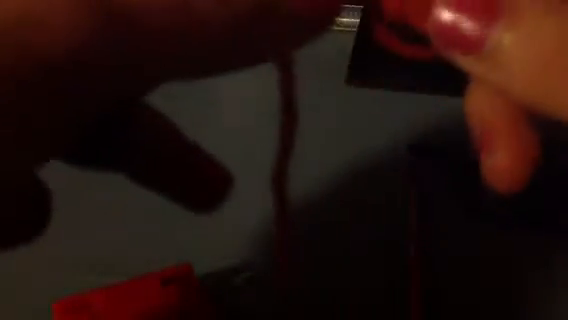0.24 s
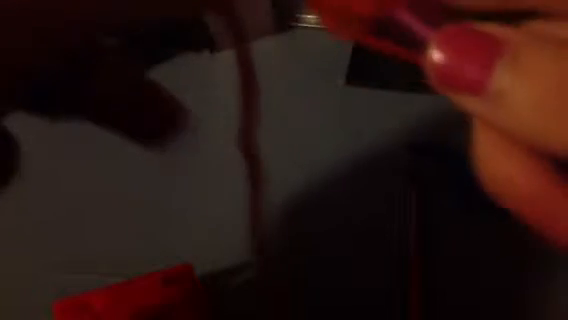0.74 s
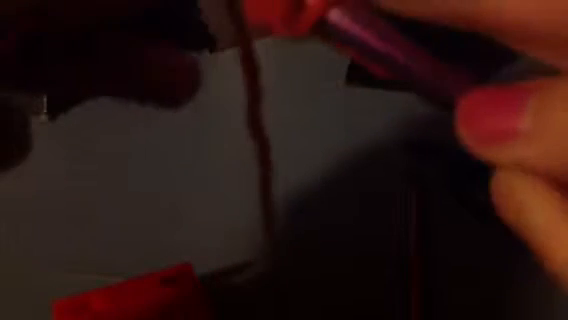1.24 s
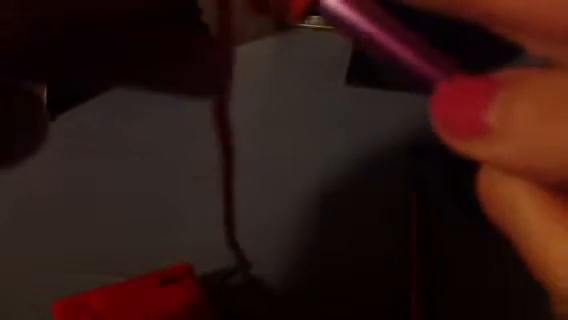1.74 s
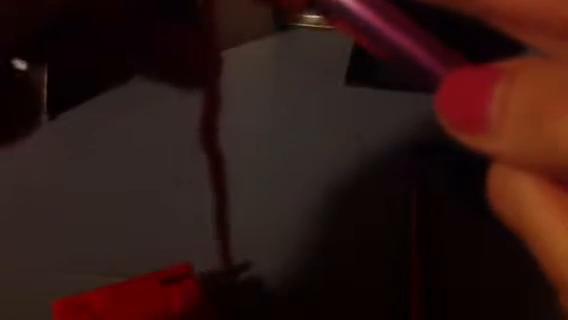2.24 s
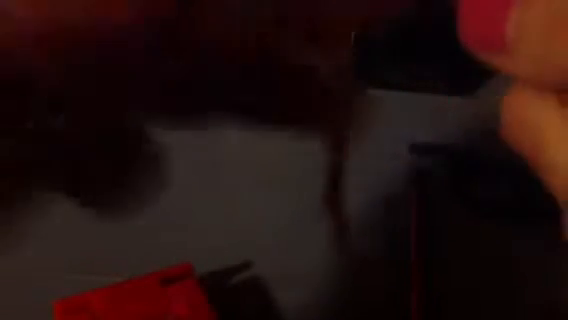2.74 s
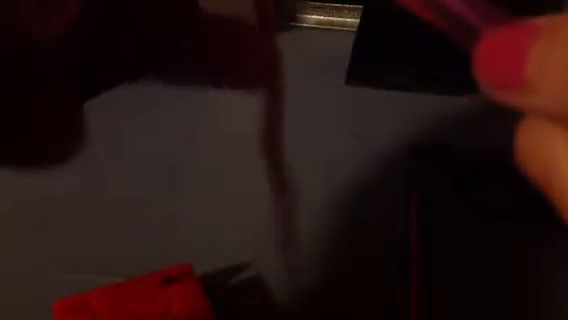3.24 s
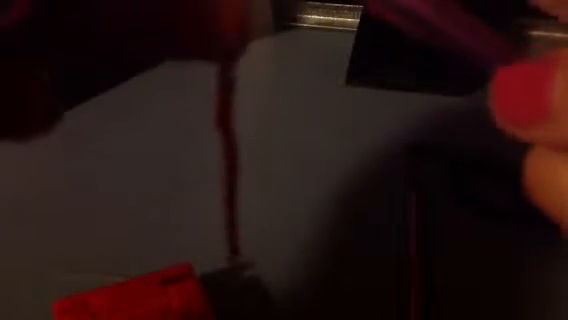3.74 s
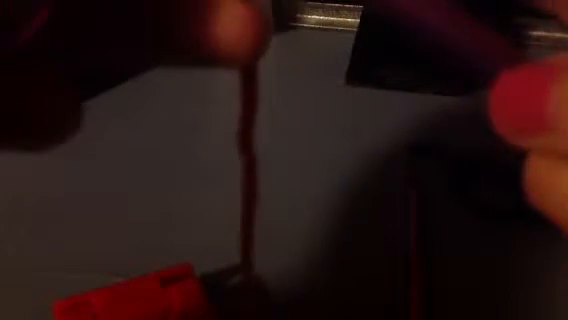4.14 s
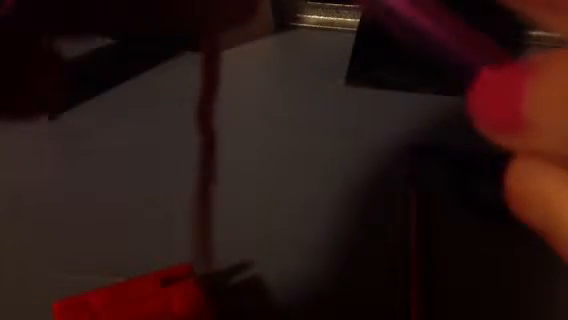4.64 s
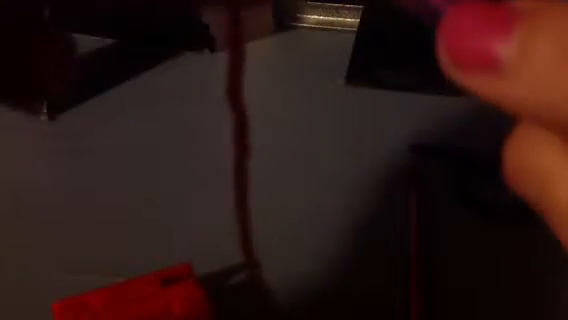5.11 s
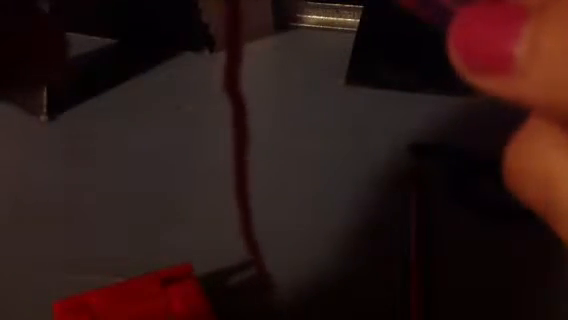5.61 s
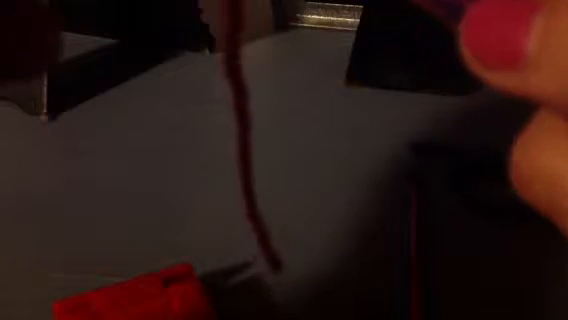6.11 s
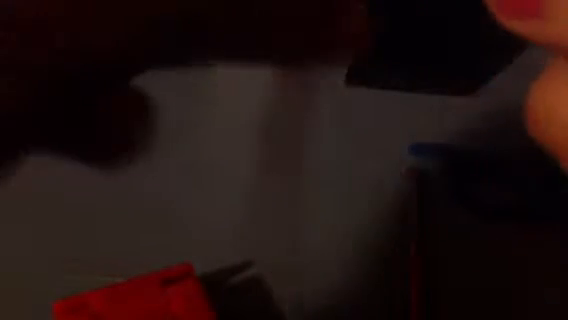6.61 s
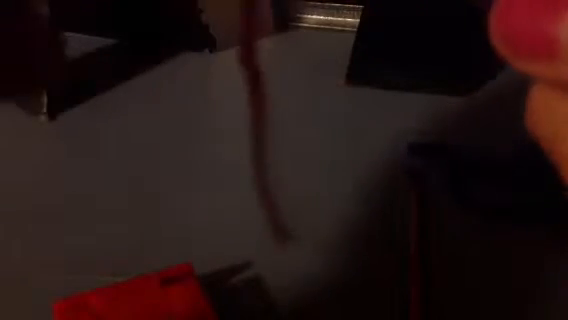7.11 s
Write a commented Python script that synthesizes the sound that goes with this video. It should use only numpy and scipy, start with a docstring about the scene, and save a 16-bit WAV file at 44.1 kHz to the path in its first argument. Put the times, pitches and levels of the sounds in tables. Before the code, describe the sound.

Close, sparse needle clicks and soft knocks, two bright scraping flurries, the later one sharpest, and gentle yarn drags over a faint room hum.

```python
"""Knitting up close

Knitting close to the microphone in a quiet room: needle tips click and scrape along each other,
the needles knock dully as they are handled, and yarn is drawn over them. Clicks and scrapes are noise
ringing through the needle resonances, knocks are a push plus decaying body modes, and the yarn is
dull stick-and-slip noise. A faint room tail follows; hum, low room noise and hiss lie underneath.
"""
import sys
import numpy as np
from scipy import signal
from scipy.fft import rfft, irfft, next_fast_len
from scipy.io import wavfile

SR = 44100
rng = np.random.default_rng(int(sys.argv[2]) if len(sys.argv) > 2 else 0)


def unload_wav(signal):
    """Save mono or channel-first audio to the path in sys.argv[1] as 16-bit WAV at rate SR, clipped to [-1, 1]."""
    wavfile.write(
        sys.argv[1],
        SR,
        np.round(np.clip(np.atleast_2d(signal).T, -1, 1) * 32767).astype(np.int16),
    )


N = 324576
TIME = np.arange(N) / SR   # s

# steady hum: pitch_hz, rms_db
HUM_TONES = [(120, -77), (240, -71.5), (358, -74)]
# spectrum of the room noise and hiss: frequency_hz, relative_level_db
AIR_SPECTRUM = [(25, -57), (60, -27), (100, -21), (135, -7.5), (200, -7), (320, -2), (430, -9),
                (800, -17.5), (5000, -25.5), (13000, -25), (16000, -29)]
AIR_RMS_DB = -61
# colour of the room's tail: frequency_hz, relative_level_db
WALL_SPECTRUM = [(100, -9.5), (400, 10), (1000, 3), (2400, -3), (4000, -6.5), (16000, -9.5)]
CUTOFF_HZ = 15350   # top of the finished sound

# dull knocks of the needles: start_s, level_db (rms of the first 10 ms), contact_hardness_hz (cut-off)
KNOCK_EVENTS = [(0.0615, -32, 800), (0.2711, -35.5, 1170), (1.0585, -27, 3400), (1.2253, -47, 2430),
                (1.3733, -53.5, 1390), (1.396, -47.5, 1370), (1.498, -50.5, 870), (1.6358, -47, 990),
                (1.6677, -50, 1400), (2.676, -33, 990), (3.0565, -30.5, 2200), (3.233, -53.5, 1390),
                (4.1379, -40, 1580), (4.4317, -31, 2060), (6.346, -35, 890), (6.3718, -38, 700),
                (6.6885, -40.5, 1700), (6.738, -42.5, 1406), (7.0024, -48, 1120)]
# resonances of the held needles: pitch_hz, relative_level_db, t60_s
BODY_MODES = [(236.8, -12, 0.18), (383, -17, 0.29), (670, -31, 0.0094), (900, -13.5, 0.0156),
              (1140, 5.5, 0.027), (1330, -10, 0.028), (1460, 8.5, 0.0088), (1605, 5, 0.058),
              (2167, 2.5, 0.03), (2530, -22, .025), (4300, 9, 0.0115)]
# spectrum of a knock's push and scatter: frequency_hz, relative_level_db
THUD_SPECTRUM = [(60, -60), (130, -13.5), (250, 0.5), (600, 2), (1100, 9), (2300, 1), (3200, 1),
                 (6000, 7.5), (16000, -18)]
# spectrum of yarn and fingers rubbing: frequency_hz, relative_level_db
RUB_SPECTRUM = [(50, -54), (130, -16), (250, -0.5), (500, -4), (750, -1), (1100, 3), (1500, -15),
                (2200, -18.5), (3500, -22), (16000, -26)]

# tip against tip: start_s, level_db (rms of the first 5 ms), ring_hz, ring_width_octaves
CLICK_EVENTS = [(0.447, -49.5, 7000, 2.7), (1.044, -46, 5400, 0.96), (1.0592, -28.5, 3740, 0.69),
                (1.2242, -33.5, 7140, 1.7), (1.6689, -39.5, 4200, 0.57), (2.662, -27.5, 9700, 0.29),
                (2.696, -36, 8300, 2.6), (2.726, -33, 9900, 1.2), (2.7813, -33.5, 7200, 0.43),
                (2.8642, -45.5, 13900, 0.57), (2.885, -51, 9000, .8), (2.92, -35.5, 12300, 1.3),
                (2.9284, -37.5, 12200, 0.91), (3.058, -33, 6250, 5.4), (3.1189, -42, 12000, 0.67),
                (3.158, -44.5, 13100, 0.23), (3.233, -39.5, 9000, 0.86), (3.37, -51, 12600, 0.44),
                (3.557, -58, 10700, 1.1), (3.806, -33.5, 8740, .28), (4.0281, -46.5, 8300, 1.7),
                (4.1377, -39.5, 4230, 1.5), (4.252, -54, 10000, .93), (4.4321, -29.5, 7000, 1.4),
                (5.326, -59, 11100, .65), (6.3097, -26, 9640, 0.13), (6.336, -32, 8300, 2.5),
                (6.3691, -18, 7370, 0.35), (6.4383, -24.5, 7100, .61), (6.528, -43, 11900, 0.61),
                (6.5489, -37.5, 12600, 1.3), (6.5636, -36.5, 10500, 1.1), (6.5942, -43.5, 11500, .94),
                (6.739, -37.5, 6860, 2.6), (6.7818, -44, 11200, .36), (6.8074, -54, 10400, 1.7),
                (6.8237, -44, 12600, .93), (7.0016, -31.5, 8950, 2.7)]
# the fingers' hold sets the needles' lowest ringing note: time_s, lowest_note_hz
GRIP_NOTES = [(.9, 4580), (1.06, 4080), (2.7, 3730), (4.42, 3770), (6.31, 6030), (6.37, 4700), (6.44, 3870),
              (7, 3300)]
# ringing notes of a needle: multiple_of_lowest_note, peak_db (over the valleys, before damping)
RING_NOTES = [(1, 10), (1.58, 6), (2.25, 7), (2.75, 8.5), (3.4, 4)]
RING_SPREAD_HZ = 420   # how far each note spreads to either side
CLICK_DAMPING_DB, SLIDE_DAMPING_DB = 11.5, 1   # sliding, hard or gentle, hardly damps the ringing

# a tip lands hard and skids along the other needle:
# start_s, length_s, scrape_db, yarn_drag_db (both before the fade along the skid), brightest_hz
SKID_STROKES = [(2.662, 0.054, -32, -39, 10500), (2.722, 0.057, -37.5, -43, 9000),
                (2.781, 0.062, -41.5, -50, 9000), (6.308, 0.092, -30.5, -36.5, 9300),
                (6.44, 0.072, -41, -51.5, 6800)]
# a skid bites at once and spends itself (shares of its length; fade from start to end)
SKID_BITE_SHARE, SKID_LIFT_SHARE = 0.13, 0.22
SKID_SCRAPE_LOSS_DB, SKID_DRAG_LOSS_DB = 21.5, 6
# a needle is drawn gently through the yarn: start_s, length_s, scrape_db, yarn_drag_db, brightest_hz
DRAW_STROKES = [(0.029, 0.15, -58.5, -56, 5600), (0.639, 0.31, -56, -64, 8700),
                (1.027, 0.022, -56, -66, 5050), (1.1, 0.084, -85, -52, 5000),
                (1.359, 0.054, -63, -52, 5100), (1.429, 0.19, -69.5, -53, 4530),
                (1.757, 0.058, -64.5, -66, 12100), (2.621, 0.14, -56, -46.5, 9500),
                (2.86, 0.15, -60.5, -66, 13000), (3.519, .1, -72.5, -60.5, 10000),
                (4.397, 0.031, -47, -55.5, 3730), (4.455, 0.074, -75, -53, 6500),
                (4.571, 0.26, -68.5, -58.5, 10000), (4.83, 0.19, -86, -66, 10000),
                (6.261, 0.17, -50.5, -50, 9200), (6.5, 0.15, -51.5, -68, 12500),
                (7.041, .17, -68, -67.5, 4970), (7.282, 0.087, -79, -63, 8950)]
# a draw swells, holds and eases off (shares of its length)
DRAW_SWELL_SHARE, DRAW_EASE_SHARE = 0.18, 0.33

# along every stroke the tip snags and the needles bump at random
# the nearer the point, the brighter the scrape and the more it snags: level with the scrape at SNAG_HZ
SNAGS_PER_S, SNAG_HZ, SNAG_DB_PER_OCTAVE = 33, 10100, 24
BUMPS_PER_S, BUMP_DB = 24, -4   # level over the drag


def from_db(db):
    """Decibels to gain."""
    return 10 ** (np.asarray(db) / 20)


def rms_one(x, size=None):
    """Scale so that the first `size` samples (or all) have rms 1."""
    return x / np.sqrt(np.mean(x[:size] ** 2) + 1e-20)


def as_loud(x, like):
    """Give x the energy of another sound."""
    return x * np.sqrt(np.sum(like ** 2) / np.sum(x ** 2))


def colour(x, db_at):
    """Causal (minimum-phase) filter whose gain in dB is a function of frequency."""
    size = 2 * next_fast_len(len(x) // 2 + 1024)
    hz = np.maximum(np.arange(size // 2 + 1) * SR / size, 1)
    # folding the cepstrum onto positive time gives minimum phase
    cepstrum = irfft(np.log(from_db(db_at(hz))))
    cepstrum[1:size // 2] *= 2
    cepstrum[size // 2 + 1:] = 0
    response = np.exp(rfft(cepstrum))
    return irfft(rfft(x, size) * response)[:len(x)]


def shaped(x, points):
    """Filter x along a curve drawn through (Hz, dB) points on a log-frequency axis."""
    at, db = np.transpose(points)
    return colour(x, lambda hz: np.interp(np.log(hz), np.log(at), db))


def dying(t, t60):
    """Decay by 60 dB in t60 seconds."""
    return from_db(-60 * t / t60)


def add(out, s, sound):
    """Mix a sound in at s seconds."""
    start = int(np.clip(s * SR, 0, N - 1))
    out[start:start + len(sound)] += sound[:N - start]


def background():
    """Low room noise and microphone hiss as shaped noise, with a mains-like hum of steady sines."""
    hum = np.zeros(N)
    for hz, db in HUM_TONES:
        phase = rng.random()   # turns
        hum += np.sqrt(2) * from_db(db) * np.sin(2 * np.pi * (hz * TIME + phase))
    air = rms_one(shaped(rng.standard_normal(N), AIR_SPECTRUM))
    return from_db(AIR_RMS_DB) * air + hum


def room(x, t60=0.32, wet_db=-15, first_wall_s=0.018):
    """A faint, dull tail from the walls: convolution with decaying noise after a short gap."""
    t = TIME[:SR]
    decay = dying(t, t60)
    tail = shaped(rng.standard_normal(len(t)) * decay * (t > first_wall_s), WALL_SPECTRUM)
    tail = tail / np.sqrt(np.sum(decay ** 2))
    return from_db(wet_db) * signal.fftconvolve(x, tail)[:N]


def pressure(length, rise_share, fall_share):
    """Attack, hold and release of one stroke, from 0 to 1."""
    along = np.linspace(0, 1, max(int(length * SR), 64))
    return np.clip(np.minimum(along / rise_share, (1 - along) / fall_share), 0, 1)


def stroke(force, per_s, spread_db, smooth_db, uneven_db, grab_s=0.00716):
    """Stick and slip: tiny catches over a smooth hiss, under a force that wavers."""
    catch_sizes = np.minimum(rng.exponential(1, SR), 4)
    impulses = from_db(spread_db * catch_sizes) * rng.choice([-1, 1], SR)
    catches = impulses * (rng.random(SR) < per_s / SR)
    grit = rms_one(catches) + from_db(smooth_db) * rng.standard_normal(SR)
    # the waver drifts to a new random value every grab_s
    waver = np.interp(TIME[:SR] / grab_s, np.arange(200), rng.standard_normal(200))
    grit = rms_one((grit * from_db(uneven_db * waver))[:len(force)])
    return np.pad(grit * force, (0, 6000))   # space to ring out


def now_and_then(sound, force, per_s, count=16):
    """Repeat a small sound at uneven gaps along a stroke, scaled by the force and a random size."""
    draws = rng.random((count, 2))
    at = ((np.arange(count) + draws[:, 0]) * SR / per_s).astype(int)
    out = np.zeros(len(force) + 6000)
    for i, size in zip(at[at < len(force)], .5 + draws[:, 1]):
        out[i:i + len(sound)] += force[i] * size * sound
    return out


def knock(hard_hz, push_db=17, scatter_t60=0.065, modes_db=-15, vary_db=2.5, low_hz=150):
    """One push, its scatter off nearby surfaces and the body's modes, all dulled by a soft contact."""
    t = TIME[:6000]
    thud = rng.standard_normal(len(t)) * dying(t, scatter_t60)
    thud[0] += 2 * from_db(push_db)
    strengths = from_db(modes_db + vary_db * rng.standard_normal(len(BODY_MODES)))
    modes = np.zeros(len(t))
    for k, (hz, db, t60) in enumerate(BODY_MODES):
        sign = (-1) ** k   # neighbouring modes start in opposite directions
        modes += sign * strengths[k] * from_db(db) * dying(t, t60) * np.sin(2 * np.pi * hz * t)
    soft = signal.butter(2, [low_hz, min(hard_hz, SR / 3)], "band", fs=SR, output="sos")
    return rms_one(signal.sosfilt(soft, shaped(thud, THUD_SPECTRUM) + modes), size=441)


def drag(force):
    """Yarn and fingers on the needles: a dull rub with soft bumps."""
    rub = stroke(force, per_s=250, spread_db=-0.5, smooth_db=-3.5, uneven_db=4)
    bumps = now_and_then(knock(hard_hz=1100), force, BUMPS_PER_S)
    return as_loud(shaped(rub, RUB_SPECTRUM), rub) + from_db(BUMP_DB) * bumps


def needle_db(hz, s, bright_hz, octaves, skirt_db, damping_db, low_hz=280, top_hz=14500):
    """Response of a needle: narrow bending resonances under a broad hump set by the contact."""
    lowest = np.interp(s, *np.transpose(GRIP_NOTES))
    notes = 1
    for multiple, db in RING_NOTES:
        offset = (hz - multiple * lowest) / RING_SPREAD_HZ
        notes = notes + from_db(db - damping_db) ** 2 / (1 + offset ** 2) ** 2
    hump = 1 / (1 + (2 * np.log2(hz / bright_hz) / octaves) ** 2) ** 1.3
    ends = (1 + (low_hz / hz) ** 4) * (1 + (hz / top_hz) ** 8)   # roll-off at both ends
    return 10 * np.log10(notes * (hump + from_db(skirt_db) ** 2) / ends)


def click(s, ring_hz, octaves, snap_cycles=27, ring_db=-18, ring_cycles=220, skirt_db=-20, rise_s=0.00041):
    """A hard snap, then a short ring that the fingers damp; higher clicks die sooner."""
    t = TIME[:2048]
    envelope = dying(t, snap_cycles / ring_hz) + from_db(ring_db) * dying(t, ring_cycles / ring_hz)
    burst = envelope * (1 - np.exp(-t / rise_s)) * rng.choice([-1, 1], len(t))
    ringing = colour(burst, lambda hz: needle_db(hz, s, ring_hz, octaves, skirt_db, CLICK_DAMPING_DB))
    return rms_one(ringing, size=220)


def scrape(s, force, bright_hz):
    """Needle on needle: bright grit that sets the needles ringing, with small snags."""
    grit = stroke(force, per_s=1300, spread_db=3.5, smooth_db=-4.5, uneven_db=5.5)
    ringing = colour(grit, lambda hz: needle_db(
        hz, s, bright_hz, octaves=1.28, skirt_db=-17.5, damping_db=SLIDE_DAMPING_DB))
    snag_db = SNAG_DB_PER_OCTAVE * np.log2(bright_hz / SNAG_HZ)
    snags = now_and_then(click(s, bright_hz, octaves=1.9), force, SNAGS_PER_S)
    return as_loud(ringing, grit) + from_db(snag_db) * snags


def sliding():
    """Hard skids and gentle draws; one pressure drives both the scrape and the drag of the yarn."""
    out = np.zeros(N)
    for s, length, scrape_db, drag_db, bright_hz in SKID_STROKES:
        force = pressure(length, SKID_BITE_SHARE, SKID_LIFT_SHARE)
        along = np.linspace(0, 1, len(force))
        add(out, s, scrape(s, force * from_db(scrape_db - SKID_SCRAPE_LOSS_DB * along), bright_hz))
        add(out, s, drag(force * from_db(drag_db - SKID_DRAG_LOSS_DB * along)))
    for s, length, scrape_db, drag_db, bright_hz in DRAW_STROKES:
        force = pressure(length, DRAW_SWELL_SHARE, DRAW_EASE_SHARE)
        add(out, s, scrape(s, force * from_db(scrape_db), bright_hz))
        add(out, s, drag(force * from_db(drag_db)))
    return out


def needles():
    """Struck needles: every dull knock and every tip click at its moment."""
    out = np.zeros(N)
    for s, db, hard_hz in KNOCK_EVENTS:
        add(out, s, from_db(db) * knock(hard_hz))
    for s, db, ring_hz, octaves in CLICK_EVENTS:
        add(out, s, from_db(db) * click(s, ring_hz, octaves))
    return out


def scene():
    """The knitting, its room and the background, in mono."""
    knitting = sliding() + needles()
    return (background() + room(knitting) + knitting)[None]


def record(dry):
    """Cut the top steeply with an elliptic low-pass."""
    steep = signal.ellip(10, .1, 80, CUTOFF_HZ, fs=SR, output="sos")
    return signal.sosfilt(steep, dry)


dry = scene()
out = record(dry)
unload_wav(out)
```